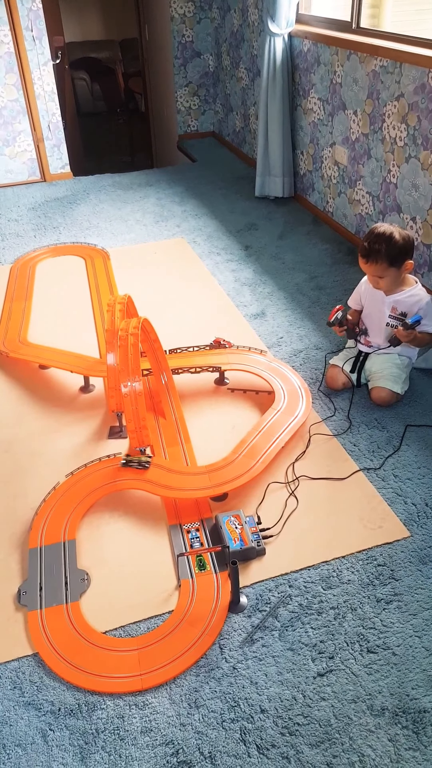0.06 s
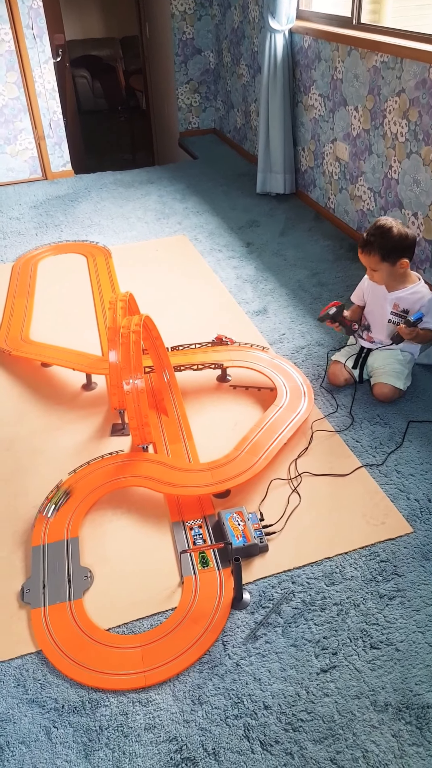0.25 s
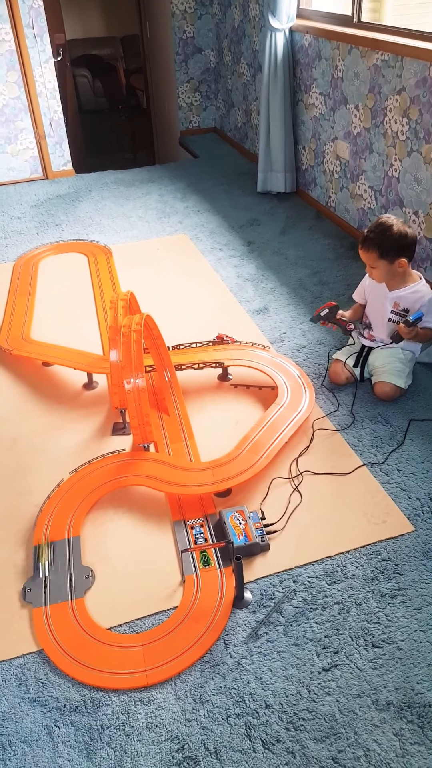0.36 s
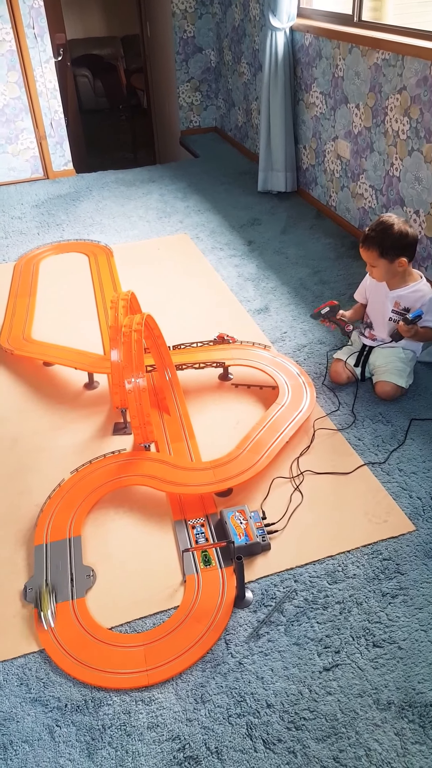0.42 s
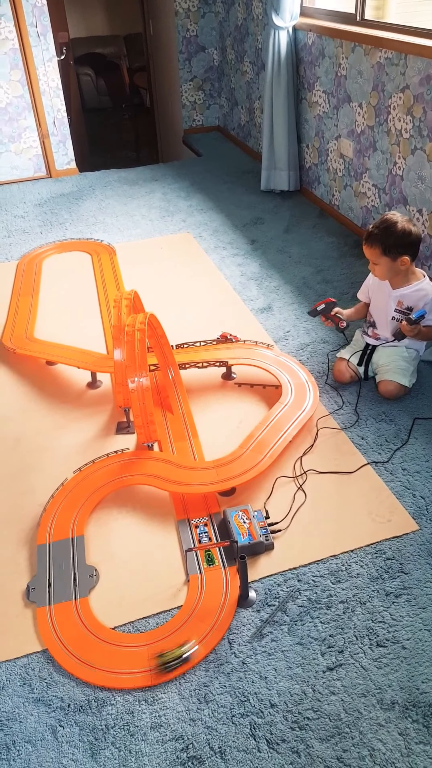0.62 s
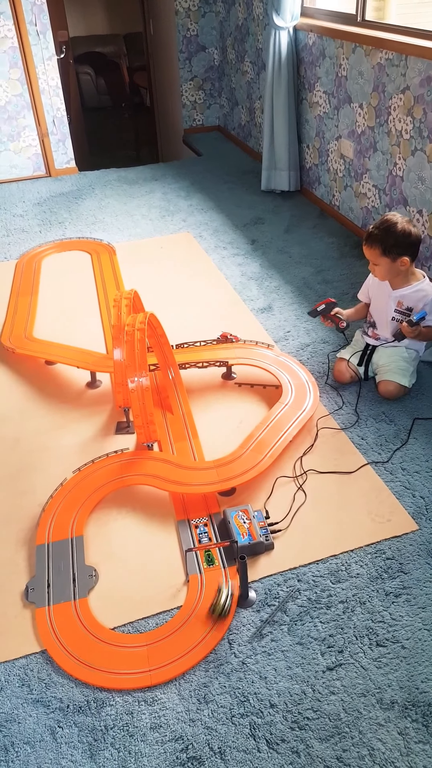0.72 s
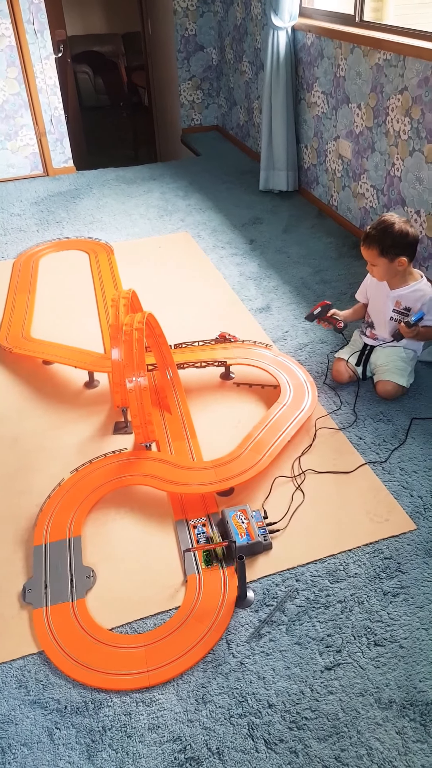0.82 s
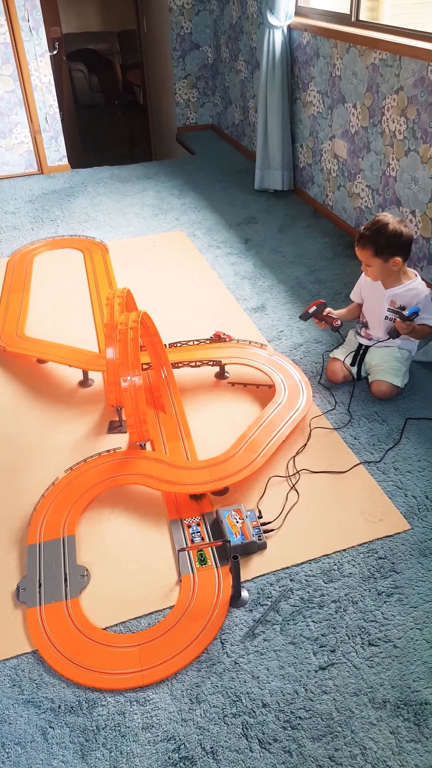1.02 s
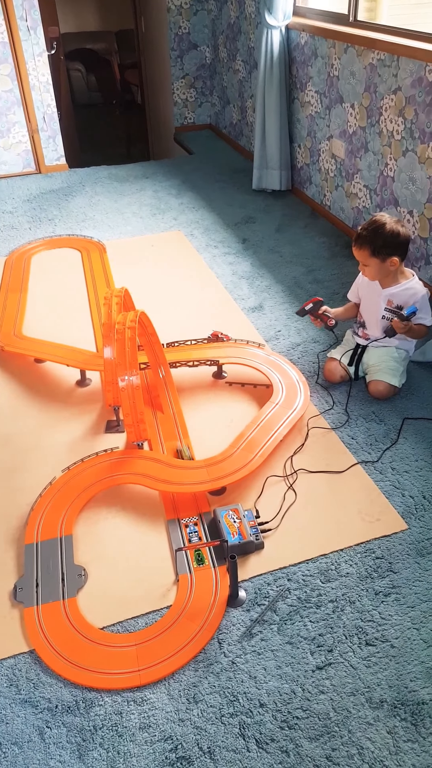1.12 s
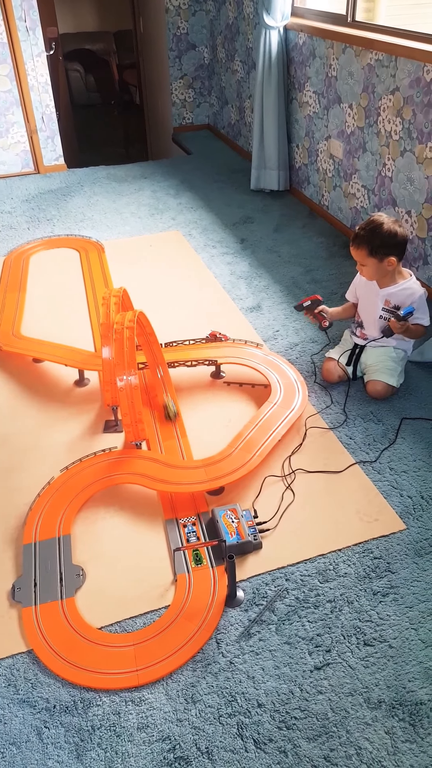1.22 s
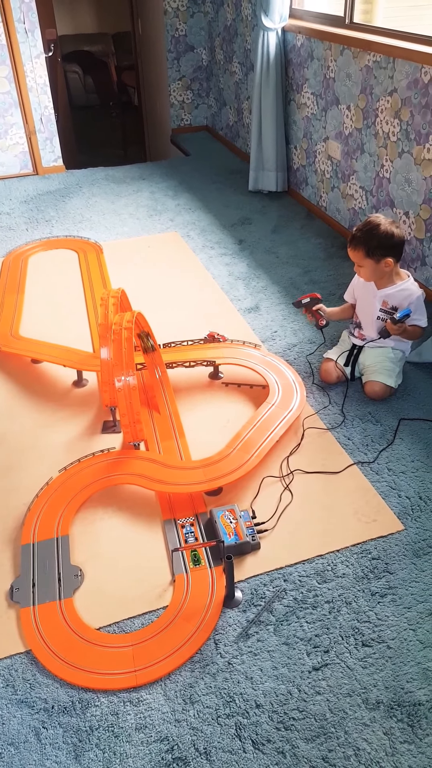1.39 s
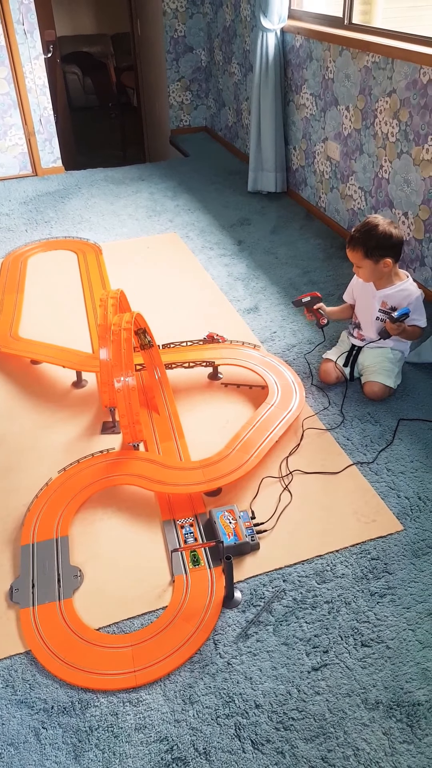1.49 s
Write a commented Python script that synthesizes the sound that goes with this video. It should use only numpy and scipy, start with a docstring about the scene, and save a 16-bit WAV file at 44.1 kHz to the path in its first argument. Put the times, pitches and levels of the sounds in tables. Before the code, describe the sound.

A toy slot car whirs and hisses around a plastic track, ticking and clacking once.

```python
"""A carpeted room, walls close by, a stereo microphone near a plastic track where a toy slot car runs.
Over the murmur of the air its motor whines, its gears rasp, its tyres hiss and its pickups sizzle on
the rails; the hollow track drones under it, most in the bend. It ticks over the joints and once clacks
hard against the slot. The walls answer, and each of the two microphone ports adds its own colour."""
import sys
import numpy as np
from scipy import signal
from scipy.fft import rfft, irfft, next_fast_len
from scipy.io import wavfile
from scipy.ndimage import uniform_filter1d, map_coordinates

SR = 44100
rng = np.random.default_rng(int(sys.argv[2]) if len(sys.argv) > 2 else 0)


def wav_out(sig):
    """Save sig, one row per channel (or a flat mono array), as 16-bit PCM at SR to the path in sys.argv[1]."""
    wavfile.write(sys.argv[1], SR, np.round(np.clip(np.atleast_2d(sig).T, -1, 1) * 32767).astype(np.int16))


N = 68355
TIME = np.arange(N) / SR

def amp(db):
    """Decibels to gain."""
    return 10 ** (np.asarray(db) / 20)

def unit(x):
    """Scaled to rms 1."""
    return x / np.sqrt(np.mean(x ** 2) + 1e-20)

def along(points, hz):
    """(Hz, value) points read on a log axis."""
    knots, values = np.transpose(points)
    return np.interp(np.log(hz + 1), np.log(knots + 1), values)

def wobble(rate):
    """A smooth random curve, rate knots a second."""
    return map_coordinates(rng.standard_normal(N), [TIME * rate], mode="mirror")

def add(out, x, s):
    """Mix x into out from time s."""
    part = out[:, round(s * SR):][:, :x.shape[1]]
    part += x[:, :part.shape[1]]

def filtered(x, response):
    """x through a complex frequency response."""
    size = 2 * next_fast_len(N // 2 + SR // 8)
    return irfft(rfft(x, size) * response(np.fft.rfftfreq(size, 1 / SR)), size)[..., :x.shape[-1]]

def colour(points):
    """The causal response through these (Hz, dB) points."""
    def response(hz):
        cepstrum = irfft(np.log(amp(along(points, hz))))
        half = len(cepstrum) // 2
        cepstrum[1:half] *= 2
        cepstrum[half + 1:] = 0
        return np.exp(rfft(cepstrum))
    return response

def body(modes):
    """Response of a body whose resonances alternate in sign."""
    return lambda hz: sum((-1) ** k * amp(db) * 1j * hz * width / (f ** 2 - hz ** 2 + 1j * hz * width)
                          for k, (f, width, db) in enumerate(modes))

def right_lead(s):
    """Response that brings a sound to the right port s earlier than the left."""
    return lambda hz: np.exp(1j * np.pi * s * np.array([-hz, hz]))

# Likeness of the room at the two ports (frequency [Hz], correlation [ratio])
LIKENESS = [(100, 0.96), (250, 0.97), (400, 0.77), (900, 0.15), (1600, 0.25), (3000, 0.26), (6000, 0.37),
            (10000, 0.061)]
def diffuse(size):
    """Noise as the room delivers it: alike in the bass, nearly unrelated in the treble."""
    def mid_side(hz):
        angle = np.arccos(np.clip(along(LIKENESS, hz), -1, 1)) / 2
        return np.array([np.cos(angle), np.sin(angle)])
    mid, side = filtered(rng.standard_normal((2, size)), mid_side)
    return np.array([mid + side, mid - side])

# Room tone (frequency [Hz], relative level [dB])
AIR = [(20, -15), (55, -4), (75, -2.5), (110, 7.5), (170, -4), (300, -8), (1000, -36.5), (8000, -24)]
def room_air():
    """The air murmurs low all round the microphone."""
    return amp(-55.5) * unit(filtered(diffuse(N), colour(AIR)))

# Decay of the carpeted room (frequency [Hz], t60 [s])
ROOM_DECAY = [(200, 0.26), (1200, 0.77), (4000, 0.34), (12000, 0.24)]
def room_tail():
    """Reverberation that lingers longest in the midrange."""
    hz, t, spectra = signal.stft(diffuse(SR // 2), SR, nperseg=256)
    fade = amp(-60 * t / along(ROOM_DECAY, hz)[:, None])
    onset = 1 - np.exp(-t / 0.0029)
    tail = signal.istft(spectra * fade * onset, SR, nperseg=256)[1][:, :SR // 2]
    return tail / np.linalg.norm(tail[0])

def contact(hold_s, t60):
    """A brief chatter: full for a moment, then gone."""
    t = np.arange(SR // 2) / SR
    return diffuse(len(t)) * amp(-60 * np.maximum(t - hold_s, 0) / t60)

# Echoes off the near walls (delay [s], left level [dB], right level [dB])
WALL_ECHOES = [(.0055, -6, -15), (.0082, 2, -11), (.0108, -5, -14), (.0158, -9, -16), (.0198, 1, -14),
               (.0247, -9, -18), (.0283, -3, -18)]
# Their colour (frequency [Hz], gain [dB])
WALL_COLOUR = [(300, -19), (3000, -7), (8000, -8), (11500, -3.5), (16000, -9)]
def hit(hold_s, t60, room_db):
    """A contact, its shorter scattered echoes from the walls and the room's tail."""
    direct = contact(hold_s, t60)
    early = np.zeros_like(direct)
    for s, left_db, right_db in WALL_ECHOES:
        add(early, contact(0.66 * hold_s, 0.66 * t60) * amp([[left_db], [right_db]]), s)
    tail = amp(room_db) * np.linalg.norm(direct[0]) * room_tail()
    return direct + filtered(early, colour(WALL_COLOUR)) + tail

def whine(curve, waver, rate):
    """A fluttering tone spread by the room; waver is a share of its pitch."""
    s, hz, db = np.transpose(curve)
    pitch = np.interp(TIME, s, hz) * (1 + waver * wobble(rate))
    tone = np.sin(2 * np.pi * np.cumsum(pitch) / SR) * amp(4 * wobble(49.92))
    reverb = amp(4) * signal.fftconvolve(tone[None], room_tail(), axes=1)[:, :N]
    return amp(np.interp(TIME, s, db)) * unit(tone + reverb)

# Motor and gear tones (time [s], pitch [Hz], level [dB])
MOTOR_WHINE = [(0, 970, -48), (0.128, 950.5, -50.5), (0.189, 890, -37), (0.281, 1038, -38.5),
               (.37, 938.8, -45), (.5, 978, -43), (0.621, 963.4, -38), (.72, 933, -48.5),
               (0.819, 957, -40.5), (0.951, 920, -68), (1.08, 900, -62)]
GEAR_WHISTLE = [(.18, 8500, -72), (.23, 8250, -47), (.28, 7730, -42), (.33, 7860, -45), (.36, 8340, -37),
                (.42, 8100, -60), (.57, 8000, -62), (.67, 7850, -48), (.73, 7814, -77)]
def motor():
    """The motor whines and its gears whistle; both fade as the car leaves the bend."""
    return whine(MOTOR_WHINE, waver=0.0506, rate=120) + whine(GEAR_WHISTLE, waver=0.0113, rate=500)

def friction(response, grain_db, grain_rate):
    """Rubbing that grips and slips in short grains and drifts in colour, heard through a body; rms 1."""
    spectra = signal.stft(diffuse(N) * amp(grain_db * wobble(grain_rate)), nperseg=512)[2]
    patches = uniform_filter1d(rng.standard_normal(spectra.shape), size=3, axis=1)
    drift_db = 1.9 * unit(uniform_filter1d(patches, size=14, axis=2))
    rubbing = signal.istft(spectra * amp(drift_db), nperseg=512)[1][:, :N]
    return unit(filtered(rubbing, response))

# Rumble under the car (frequency [Hz], relative level [dB])
DECK_RUMBLE = [(50, -51.5), (130, -9), (220, -3.5), (280, -3.5), (335, 0), (392, -0.5), (450, -2.5),
               (560, -7), (750, -12.5), (1500, -30.5)]
# Boom of the deck (frequency [Hz], width [Hz], gain [dB])
DECK_MODES = [(395, 19, -2.5)]
def deck_rumble():
    """The hollow deck booms as the car rolls over it."""
    deck = lambda hz: colour(DECK_RUMBLE)(hz) * (1 + body(DECK_MODES)(hz))
    return friction(deck, grain_db=0.9, grain_rate=60)

# Colours of the rubbing parts (frequency [Hz], relative level [dB])
PICKUP_SIZZLE = [(3000, -45), (7000, 1), (9000, -4), (12000, 3), (16000, 1.5)]
TYRE_HISS = [(1500, -22), (3000, -8), (3900, -0.5), (5500, 0), (7500, -0.5), (9000, -0.5), (11000, -6),
             (16000, -22)]
GEAR_RASP = [(200, -23), (600, -5.5), (1200, -5), (2100, 0), (3200, -2), (4200, -10), (7000, -37)]
# Ringing of the plastic track (frequency [Hz], width [Hz], gain [dB])
TRACK_MODES = [(835, 48, -6), (914, 40, -3.5), (971, 42, -4.5), (1109, 18, -4.5), (1153, 22, -5.5),
               (1284, 51, -4.5), (1392, 22, -1), (1518, 80, -5), (1638, 23, -3.5), (1710, 47, -6),
               (2480, 71, -23), (3410, 27, -10)]
# Relative levels along the run (time [s], sizzle [dB], hiss [dB], rasp [dB], drone [dB], rumble [dB])
RUN_LEVELS = [(0, -42, -46, -50.5, -62, -49), (0.045, -37.5, -40, -48.5, -54, -45),
              (0.14, -42.5, -42.5, -49.5, -51, -48.5), (0.197, -34, -35.5, -42, -32.5, -42.5),
              (0.27, -36.5, -40, -38, -38, -44), (0.35, -30.5, -38, -37, -34, -43.5),
              (0.44, -27.5, -35.5, -38.5, -31.5, -44), (0.63, -30, -35.5, -37.5, -38.5, -43.5),
              (0.72, -32.5, -34.5, -38, -30.5, -43), (0.791, -33, -36.5, -40.5, -34.5, -45),
              (0.88, -32.5, -33.5, -37, -34.5, -42.5), (0.958, -35, -41, -43.5, -43, -44),
              (1.08, -45.5, -47.5, -51, -49.5, -50), (1.151, -36, -40.5, -49, -40.5, -48.5),
              (1.23, -36, -37, -37.5, -42, -42), (1.282, -25.5, -32.5, -38, -36, -41.5),
              (1.35, -36, -37.5, -38.5, -39, -41.5), (1.421, -39, -41, -44.5, -43, -45),
              (1.48, -40.5, -48, -45.5, -65, -47.5), (1.55, -67.5, -59.5, -58.5, -71, -54.5)]
def running_car():
    """Pickups, tyres and gears rub, the track drones; the chassis judders all but the deck's rumble."""
    s, *levels = np.transpose(RUN_LEVELS)
    sizzle_db, hiss_db, rasp_db, drone_db, rumble_db = [np.interp(TIME, s, db) for db in levels]
    judder = amp(0.54 * wobble(170))
    sizzle = amp(sizzle_db - 3) * friction(colour(PICKUP_SIZZLE), grain_db=0.5, grain_rate=600)
    hiss = amp(hiss_db) * friction(colour(TYRE_HISS), grain_db=1.4, grain_rate=630)
    rasp = amp(rasp_db + 1) * friction(colour(GEAR_RASP), grain_db=-0.5, grain_rate=500)
    drone = amp(drone_db - 2.5) * friction(body(TRACK_MODES), grain_db=3.0, grain_rate=300)
    rumble = amp(rumble_db - 1) * deck_rumble()
    return judder * (sizzle + hiss + rasp + drone) + rumble

# Joints between track pieces (time [s], tick level [dB], scrape level [dB])
TRACK_JOINTS = [(0.1817, -34, -32), (0.2301, -24.5, -43), (0.2947, -24.5, -27), (0.3989, -26.5, -38),
                (0.559, -19.5, -27), (0.6718, -29, -44), (0.7383, -28.5, -33), (0.829, -22, -28),
                (0.8672, -25, -42), (1.249, -26.5, -42), (1.306, -20.5, -42)]
# Colours of tick and scrape (frequency [Hz], gain [dB])
TICK_COLOUR = [(300, -12), (900, 0), (3000, -8), (6000, 2), (10000, 0.5), (16000, -5.5)]
SCRAPE_COLOUR = [(3000, -35), (8000, -6), (11500, -20), (13500, 1), (16000, 7)]
def joint_ticks():
    """The pickups catch on each joint and scrape brightly as they settle."""
    ticks, scrapes = np.zeros((2, N)), np.zeros((2, N))
    for s, tick_db, scrape_db in TRACK_JOINTS:
        add(ticks, amp(tick_db) * hit(hold_s=0.0017, t60=0.014, room_db=-0.5), s)
        add(scrapes, amp(scrape_db) * hit(hold_s=0.012, t60=0.07, room_db=-6), s)
    return filtered(ticks, colour(TICK_COLOUR)) + filtered(scrapes, colour(SCRAPE_COLOUR))

# Colour of the blow (frequency [Hz], gain [dB])
CLACK_COLOUR = [(100, -48), (660, -28), (860, -0.5), (1500, -1.5), (2200, -0.5), (2950, -3.5), (3700, 0),
                (4300, -2.5), (6000, -2.5), (9000, -3.5), (12000, -2), (16000, -9)]
# Hard ring of the car's plastic shell (frequency [Hz], width [Hz], gain [dB])
SHELL_MODES = [(1660, 170, -1), (2980, 280, 1), (4250, 380, 2), (9250, 600, -4)]
# Rails and track ringing on (frequency [Hz], level [dB], t60 [s])
RAIL_MODES = [(926, -31, .25), (969, -36, .7), (1384, -34, .6), (1690, -30, .25), (2918, -41, .45),
              (3388, -37, .2), (3709, -42, .6), (4721, -37, .35), (7440, -41, .25)]
def clack():
    """The car slams against the slot in the bend and rings its shell, the track and the rails."""
    def plastic(hz):
        track = amp(-1) * body(TRACK_MODES)(hz)
        shell = sum(body([mode])(hz) for mode in SHELL_MODES)
        return colour(CLACK_COLOUR)(hz) * (1 + track + shell)
    blow = amp(-8.5) * filtered(hit(hold_s=0.003, t60=0.011, room_db=2), plastic)
    t = np.arange(blow.shape[1]) / SR
    ring = sum(amp(db - 60 * t / t60) * np.sin(2 * np.pi * (hz * t + rng.random((2, 1))))
               for hz, db, t60 in RAIL_MODES)
    out = np.zeros((2, N))
    add(out, blow + ring, s=0.4535)
    return filtered(out, right_lead(s=0.00006))  # further right than the rest of the run

def scene():
    """The car, a little off the microphone's centre, over the room's air."""
    car = running_car() + motor() + joint_ticks() + clack()
    return filtered(car, right_lead(s=0.00008)) + room_air()

# Colour of the microphone ports (frequency [Hz], gain [dB])
LEFT_PORT = [(150, 1), (450, 1.5), (680, 1), (1000, -2), (1600, 1), (2600, 0.5), (3000, 2.5), (3400, 1),
             (3900, 0.5), (4600, -2), (5500, 3), (6200, 1), (7400, 5.5), (8400, -8), (9100, -3),
             (10800, 7.5), (11750, 13), (12900, 5.5), (15600, -6.5)]
RIGHT_PORT = [(150, 0.5), (450, 2), (850, 3), (1600, 0.5), (2150, -6.5), (2950, 1.5), (4200, 0), (5800, 5),
              (6700, 3), (7300, -8), (8150, -1), (8900, -2), (10600, -6.5), (11800, 1), (12700, -14),
              (13500, -8.5), (15600, -7)]
def record(dry):
    """Each port colours its channel; peaks are rounded off and nothing passes the band limit."""
    ceiling, top_hz = 0.85, 15780
    ports = filtered(dry, lambda hz: np.array([colour(LEFT_PORT)(hz), colour(RIGHT_PORT)(hz)]))
    rounded = ports / (1 + np.abs(ports / ceiling) ** 6) ** (1 / 6)
    return filtered(rounded, lambda hz: hz < top_hz)

dry = scene()
out = record(dry)
wav_out(out)
```